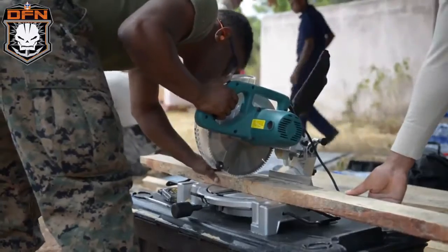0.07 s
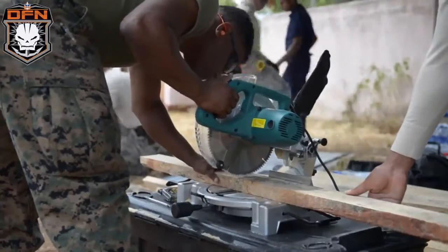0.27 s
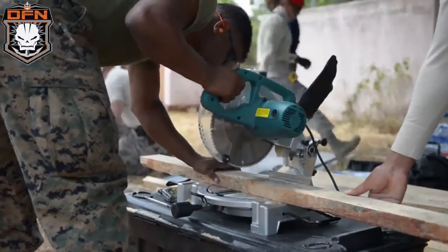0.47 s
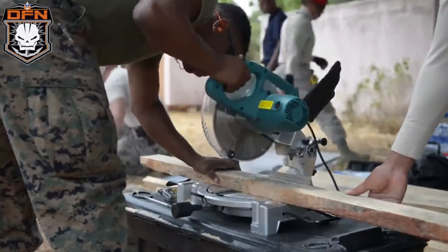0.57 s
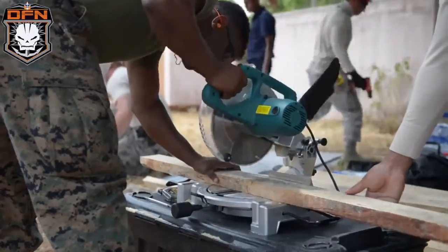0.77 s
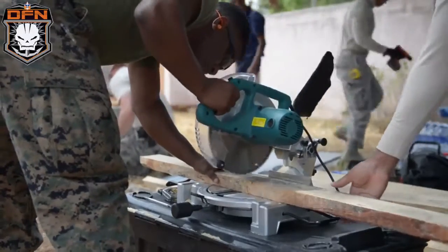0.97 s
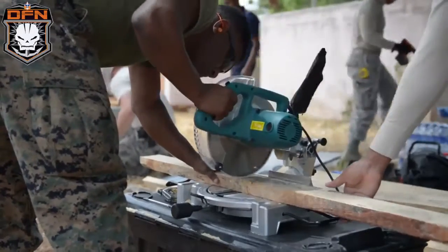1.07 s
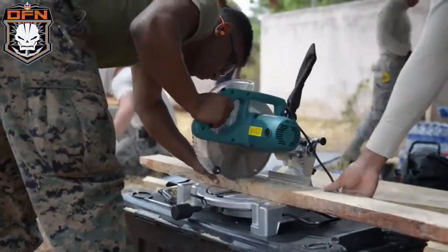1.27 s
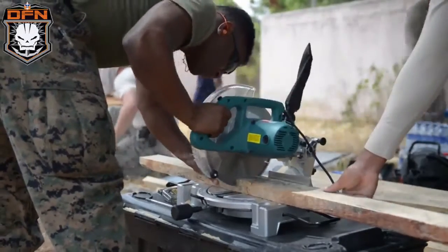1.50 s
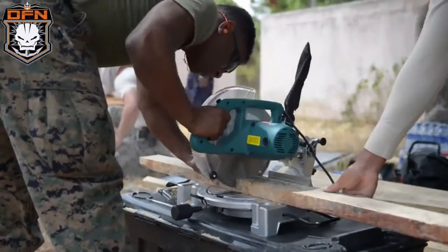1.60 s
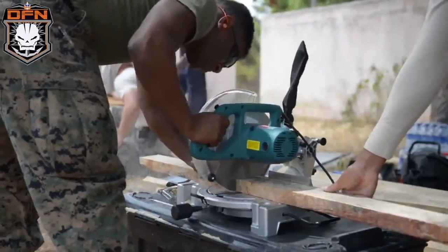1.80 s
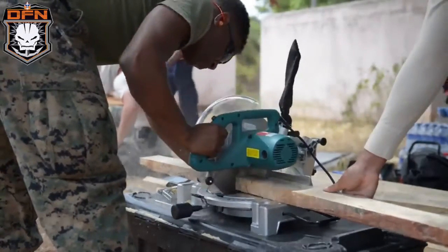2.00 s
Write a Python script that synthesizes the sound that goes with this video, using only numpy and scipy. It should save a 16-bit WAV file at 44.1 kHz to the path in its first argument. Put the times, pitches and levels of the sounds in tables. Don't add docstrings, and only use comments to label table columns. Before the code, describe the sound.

An electric mitre saw after a quiet outdoor start with soft wind: switch click, buzzing motor run-up to a high whine, then teeth tear into a board, pitch sagging under load, heard at close range.

```python
import sys
import numpy as np
from scipy import signal
from scipy.fft import rfft, irfft
from scipy.io import wavfile
from scipy.ndimage import uniform_filter1d

SR = 44100
rng = np.random.default_rng(int(sys.argv[2]) if len(sys.argv) > 2 else 0)


def boost(x):
    u = np.asarray(x, float) / 20
    return 10 ** u


def log_audio(samples):
    frames = np.atleast_2d(samples).T
    limited = np.clip(frames, -1, 1)
    pcm = np.round(limited * 32767).astype(np.int16)
    wavfile.write(sys.argv[1], SR, pcm)


N = 90228
TIME_S = np.arange(N) / SR

# start_s [s], level_db [dB]
TOOTH_BITE = [
    (1.19, -52.5),
    (1.22, -50.5),
    (1.386, -43.5),
    (1.57, -42.5),
    (1.618, -42.5),
    (1.756, -44.5),
    (1.976, -43),
    (2.045, -46),
]
BITE_IN_S = .018


def unit(x):
    return x / np.sqrt(np.mean(x ** 2) + 1e-20)


def noise():
    return rng.standard_normal(N)


def track(rows):
    s, *columns = np.transpose(rows)
    return [np.interp(TIME_S, s, column) for column in columns]


def drift(rate_hz):
    r = np.exp(-2 * np.pi * rate_hz / SR)
    settle = 20000
    wander = signal.lfilter([1], [1, -2 * r, r * r], rng.standard_normal(N + settle))
    return unit(wander[settle:])


def colour(x, points):
    hz, db = np.transpose(points)
    f = np.arange(N // 2 + 1) * SR / N + 1
    gain = boost(np.interp(np.log(f), np.log(hz), db, left=-90, right=-90))
    return unit(irfft(rfft(x) * gain, N))


def resonate(x, rows):
    out = 0
    for k, (hz, width_hz, db) in enumerate(rows):
        r = np.exp(-np.pi * width_hz / SR)
        top = [(1 - r * r) / 2, 0, (r * r - 1) / 2]
        bottom = [1, -2 * r * np.cos(2 * np.pi * hz / SR), r * r]
        ring = signal.lfilter(top, bottom, x)
        out = out + (-1) ** k * boost(db) * np.sqrt(SR / width_hz) * ring
    return out


def whine(turns, width_hz):
    phase = 2 * np.pi * turns
    return drift(width_hz) * np.cos(phase) + drift(width_hz) * np.sin(phase)


def bite_db():
    start_s, start_db = TOOTH_BITE[0]
    level, = track([(start_s - BITE_IN_S, start_db - 12)] + list(TOOTH_BITE))
    return level


def wood_load_db():
    return bite_db() + 54.5


def torque_throb(turns):
    return 1 + .45 * np.cos(2 * np.pi * turns)


def wind():
    # start_s [s], level_db [dB]
    gusts = [
        (0.0, -60),
        (0.04, -49),
        (0.18, -58),
        (0.23, -48),
        (1.21, -59),
        (1.42, -48),
        (1.56, -60),
        (1.82, -49),
        (2.04, -66),
    ]
    # pitch_hz [Hz], level_db [dB]
    rumble = [(12, -39), (20, -12.5), (62, 0.5), (103, -5.5), (124, -15.5), (260, -43.5), (340, -61),
              (570, -120)]
    return boost(track(gusts)[0]) * colour(noise(), rumble)


def site():
    # pitch_hz [Hz], level_db [dB]
    bustle = [(88, -37), (150, 3.5), (393, -5), (535, -5.5), (833, -6), (1160, -13.5), (1380, -15),
              (3600, -18.5), (15000, -44.5)]
    return boost(-61 + .34 * drift(4.2)) * colour(noise(), bustle)


def far_machine():
    pitch_hz, width_hz, level_db = 1126, 39, -66.5
    return boost(level_db) * unit(resonate(noise(), [(pitch_hz, width_hz, 0)]))


def fan(turns, mesh):
    # pitch_hz [Hz], level_db [dB]
    rush = [(88, -41), (150, -21), (182, -70), (252, -9), (393, -23), (612, -1.5), (1870, -4.5), (2270, -1),
            (15000, -25.5)]
    level_db, start_db, tilt_db = -48, -9.5, -3
    slow = 1 - mesh / mesh.max()
    air = colour(noise(), rush)
    low = signal.sosfilt(signal.butter(2, 8500, fs=SR, output="sos"), air)
    air = low + (air - low) * boost(2 * tilt_db * slow)
    return boost(level_db + start_db * slow) * air * (1 + slow * (torque_throb(turns) - 1))


def gear_rattle(turns, current):
    # pitch_hz [Hz], level_db [dB]
    rattle = [(71, -36), (120, 7), (532, -16.5), (870, 6.5), (1090, -23), (1940, -7), (6000, -31),
              (7800, -25), (13200, -120)]
    level_db, follows_current = -48.5, .68
    level = boost(level_db + follows_current * (current + 48))
    return level * colour(noise(), rattle) * torque_throb(turns)


def stand_shake(turns, mesh, current):
    # start_s [s], level_db [dB]
    shake = [
        (0.6, -72),
        (0.616, -54),
        (0.836, -39.5),
        (1.118, -57.5),
        (1.4, -55),
        (1.416, -84),
        (1.632, -46.5),
        (2.01, -41),
        (2.045, -46),
    ]
    # pitch_hz [Hz], width_hz [Hz], level_db [dB]
    stand = [(249, 21, -3), (330.6, 28, -6), (429, 65, -4.5)]
    rotor_share, rotor_db, stand_db, hum_db = .128, -1.5, -8, -8
    bogged = np.clip((mesh.max() - mesh) / 900, 0, 1)
    strain = bogged * np.clip(wood_load_db() / 20, 0, 1)
    rotor = boost(rotor_db) * strain * whine(rotor_share * np.cumsum(mesh) / SR, 10.6)
    frame = boost(stand_db) * (1 - .41 * strain) * unit(resonate(noise(), stand))
    second_hum = boost(hum_db + .97 * (current + 49)) * (1 - strain) * np.sin(4 * np.pi * turns)
    return boost(track(shake)[0]) * (rotor + frame + second_hum)


def hum(turns, current):
    level_db, follows_current = -43.5, .52
    level = boost(level_db + follows_current * (current + 60) + drift(7.1))
    return level * np.sin(2 * np.pi * turns) * np.clip(wood_load_db() / 20, .2, 1) ** 2


def gear_whines(turns, mesh, current):
    # mesh_multiple [ratio], width_hz [Hz], idle_db [dB], current_gain [dB/dB], bite_gain [dB/dB]
    whines = [(1, 95, -58, .1, .4), (1.86, 220, -64.5, .5, .02), (2.75, 200, -74, .1, .0),
              (3.5, 900, -70, .05, .0)]
    # pitch_hz [Hz], width_hz [Hz], level_db [dB]
    guard = [(1225, 97, -1), (1340, 49, 6), (1525, 71, 3.5), (2000, 293, 5.5), (2430, 33, 6),
             (3660, 630, 13.5)]
    patch_db, patch_hz = 2, 25
    gear, load = np.cumsum(mesh) / SR, wood_load_db()
    lines = 0
    for multiple, width_hz, idle_db, current_gain, bite_gain in whines:
        level_db = idle_db + current_gain * (current + 56.5) + bite_gain * load
        lines = lines + boost(level_db + patch_db * drift(patch_hz)) * whine(multiple * gear, width_hz)
    lines = lines * torque_throb(turns)
    out = lines.copy()
    for hz, width_hz, db in guard:
        out += resonate(lines, [(hz, width_hz, db + 10 * np.log10(width_hz / SR))])
    return out


def housing_knocks(turns, current):
    # pitch_hz [Hz], width_hz [Hz], level_db [dB]
    housing = [(719, 172, 1), (917, 46, 2.5), (1480, 83, -12), (2450, 190, -12), (3700, 250, -4.5)]
    jitter_db, puff_ms, low_noise, high_noise = 2, 4, .3, .8
    ticks = np.diff(np.floor(turns), prepend=0) * boost(jitter_db * drift(130))
    puff = unit(signal.lfilter([1], [1, -np.exp(-1000 / puff_ms / SR)], ticks)) * noise()
    low = resonate(unit(ticks) + low_noise * puff, housing[:2])
    knocks = low + high_noise * resonate(puff, housing[2:])
    muffle = signal.butter(3, 3850, fs=SR, output="sos")
    return boost(current) * unit(signal.sosfilt(muffle, knocks))


def motor(turns, mesh, current):
    switch_s, click_rise_s, standstill_db = .591, .00089, -8
    out = fan(turns, mesh) + gear_rattle(turns, current)
    out += stand_shake(turns, mesh, current) + hum(turns, current)
    out += gear_whines(turns, mesh, current) + housing_knocks(turns, current)
    out *= np.where(turns < 4.9, boost(standstill_db), 1)
    return out * np.clip((TIME_S - switch_s) / click_rise_s, 0, 1)


def chip_clicks():
    chips_per_s, spread_db = 5000, 1.64
    sizes = boost(spread_db * np.minimum(rng.exponential(1, N), 4)) * rng.choice([-1, 1], N)
    chips = unit(sizes * (rng.random(N) < chips_per_s / SR))
    return unit(chips + .8 * noise())


def blade_ring(drive):
    # pitch_hz [Hz], width_hz [Hz], level_db [dB]
    plate = [(2620, 130, -8.5), (3340, 96.6, -14), (3750, 240, -10.5), (3950, 130, -30), (5036, 35, -11),
             (5406, 110, -12), (5760, 100, -11.5), (6100, 150, -11), (6260, 65, -7.5), (6590, 58, -7),
             (8390, 400, -10.5), (9230, 49, -14.5), (12300, 440, -18), (14390, 200, -14)]
    small = [(hz, 35, -22) for hz in rng.uniform(1800, 15000, size=22)]
    patch_db, patch_hz = 3.5, 3.3
    return sum(boost(patch_db * drift(patch_hz)) * resonate(drive, [mode]) for mode in plate + small)


def cut(turns, mesh):
    # pitch_hz [Hz], level_db [dB]
    chips = [(59, -18), (100, 2), (208, -5.5), (279, -18.5), (797, -4), (1960, -9.5), (2270, -12),
             (3680, -10), (15000, -17)]
    chips_db, teeth_db, overtone_db = -1.5, -7, -7.5
    click_drive_db, teeth_drive_db = -10, -16.5
    tooth_multiple, sag_hz = 2.38, 90
    clicks = chip_clicks()
    depth = np.clip((mesh.max() - mesh) / sag_hz, 0, 1)
    tooth = tooth_multiple * np.cumsum(mesh) / SR
    teeth = depth * whine(tooth, 290)
    upper = 0
    for k in range(2, 5):
        audible = k * tooth_multiple * mesh < 15000
        upper = upper + boost(overtone_db + 2.5 * drift(8.6)) * whine(k * tooth, 190) * audible
    sound = boost(chips_db) * colour(clicks, chips) + boost(teeth_db) * (teeth + depth * upper)
    sound += blade_ring(boost(click_drive_db) * clicks + boost(teeth_drive_db) * teeth)
    on = np.clip((TIME_S - TOOTH_BITE[0][0]) / BITE_IN_S, 0, 1)
    pulse = 1 + .029 * np.cos(2 * np.pi * turns)
    return on * boost(bite_db() + .98 * drift(35)) * sound * pulse


def scene():
    # start_s [s], gear_mesh_hz [Hz], current_db [dB], torque_pulse_hz [Hz]
    motor_run = [(.59, 500, -41.5, 104.8), (.608, 616, -47, 98.4), (.613, 657.6, -38, 97.33),
                 (.66, 900, -45.5, 98.6), (.72, 1207, -42.5, 96), (.8, 1669, -50, 96),
                 (.86, 1866, -57.5, 94.26), (.89, 1936, -64.5, 96.45), (1.05, 2190, -59.5, 98.8),
                 (1.2, 2430, -76, 99.02), (1.335, 2435, -59, 99.75), (1.4, 2230, -67.5, 100.4),
                 (1.5, 1891, -51.5, 101.8), (1.6, 1529, -54, 100.5), (1.7, 1338, -47, 100.4),
                 (1.9, 1299, -53, 98.18), (2.02, 1293, -51, 99.53), (2.05, 1323, -72, 97)]
    first_knock_s = .6125
    mesh, current, pulse_hz = track(motor_run)
    turns = np.cumsum(pulse_hz) / SR
    turns = np.maximum(turns - turns[int(first_knock_s * SR)] + 5, 0)
    background = wind() + site() + far_machine()
    return (background + motor(turns, mesh, current) + cut(turns, mesh))[None]


def thin_moments(dry):
    thin = [
        1.384,
        1.661,
        1.767,
        1.937,
    ]
    length_s, look_hz, safe_hz = .03, 900, 280
    keep_db, keep_db_per_khz, rest_db, kept_gain = .2, .17, -24, .45
    size = 4096
    out, t = dry.copy(), np.arange(-size // 2, size // 2)
    shape = np.cos(np.pi * np.clip(t / SR / length_s, -.5, .5))
    for s in thin:
        span = int(s * SR) + t
        lines = rfft(dry[0, span] * shape)
        power = uniform_filter1d(abs(lines) ** 2, size=15)
        over = 10 * np.log10(power / uniform_filter1d(power, int(look_hz * size / SR)))
        khz = np.arange(len(over)) * SR / size / 1000
        kept = uniform_filter1d(1. * (over > keep_db + keep_db_per_khz * khz), size=5)
        lines[:int(safe_hz * size / SR)] = 0
        change = kept_gain * kept - (1 - boost(rest_db)) * (1 - kept)
        out[0, span] += irfft(lines * change) * (shape > 0)
    return out


def low_pass(x):
    return signal.sosfilt(signal.butter(12, 15570, fs=SR, output="sos"), x)


def record(dry):
    steep = signal.ellip(12, .3, 60, 15000, fs=SR, output="sos")
    mix = signal.sosfilt(steep, thin_moments(dry))
    return low_pass(mix)


dry = scene()
out = record(dry)
log_audio(out)
```